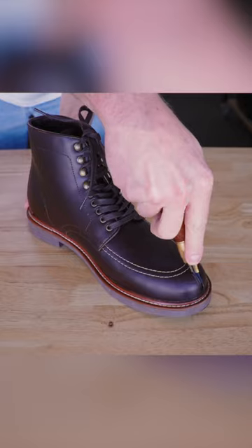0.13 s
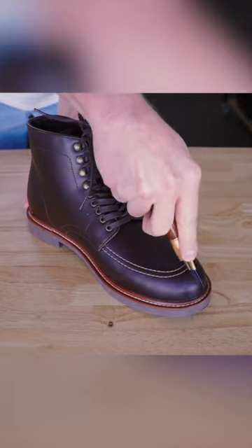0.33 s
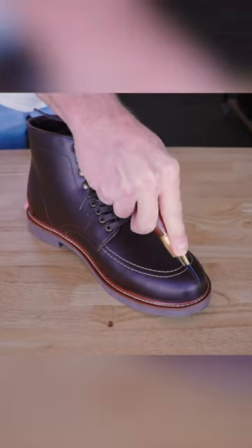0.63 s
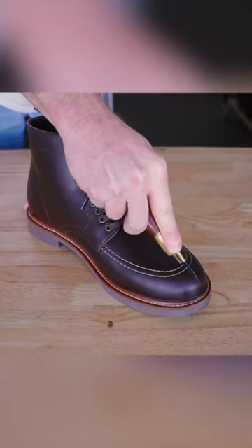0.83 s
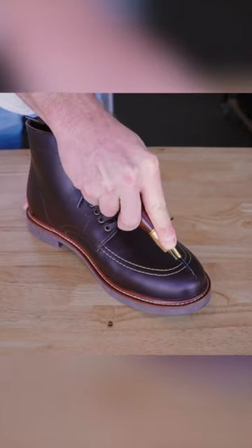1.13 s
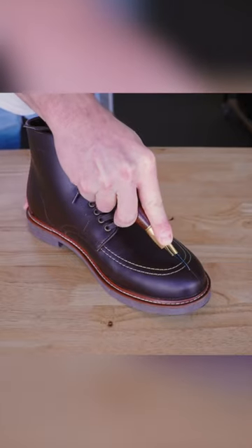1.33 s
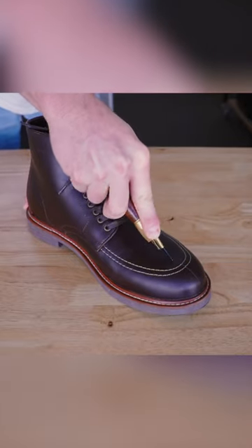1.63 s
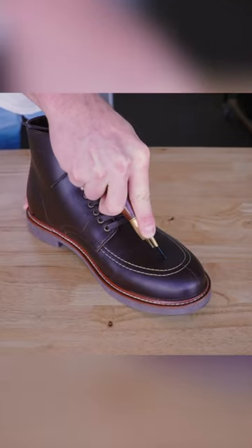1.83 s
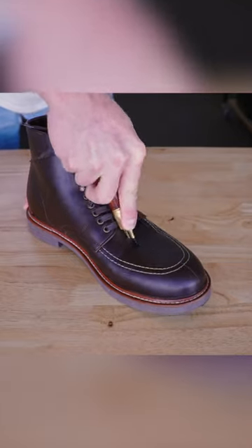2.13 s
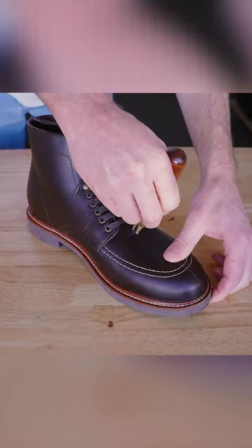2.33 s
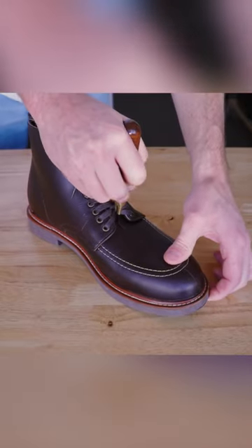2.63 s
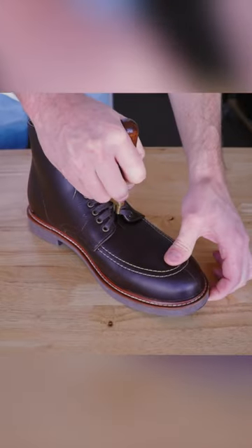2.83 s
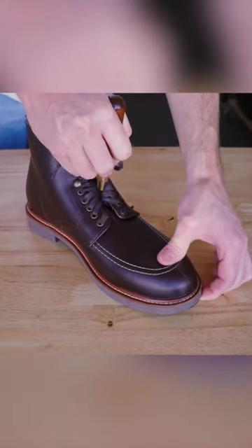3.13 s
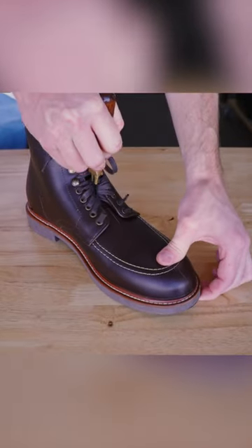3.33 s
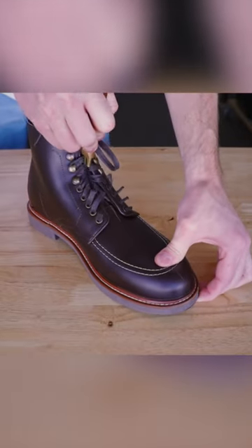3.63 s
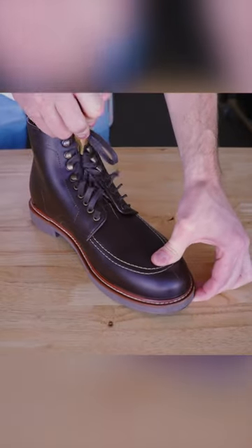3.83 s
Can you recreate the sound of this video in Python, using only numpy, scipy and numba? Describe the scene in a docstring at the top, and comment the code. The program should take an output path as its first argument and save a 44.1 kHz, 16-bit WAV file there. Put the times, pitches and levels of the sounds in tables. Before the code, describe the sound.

Leather scraping and tearing under a blade, followed by a quick run of snapping laces.

```python
"""You hear leather rasping and squeaking in a quiet room, then laces snapping one by one.
A hooked knife is being drawn up a leather boot on a wooden bench, close by. Its fibres tear in
thousands of tiny clicks that make the hollow boot and the blade ring. Just before the laces go,
the boot drops back on the bench with a thump. A limiter holds down the loudest peaks."""
import sys
import numpy as np
from scipy import signal
from scipy.fft import rfft, irfft
from scipy.io import wavfile
from scipy.ndimage import uniform_filter1d, minimum_filter1d
from numba import njit

SR = 44100
rng = np.random.default_rng(int(sys.argv[2]) if len(sys.argv) > 2 else 0)


def digitize_waveform(pressure):
    """Quantize a signal to 16-bit integers and store it at the path in sys.argv[1].

    Rows of a 2-D input are taken as channels; values are limited to [-1, 1].
    """
    field = np.atleast_2d(pressure).T
    bounded = np.clip(field, -1, 1)
    quanta = np.round(bounded * 32767).astype(np.int16)
    wavfile.write(sys.argv[1], SR, quanta)


N = 176400
T = np.arange(N) / SR

# Tone of the room's air: pitch_hz, relative_db
ROOM_TONE = [(18, -44), (30, -21), (86, -3), (486, -9), (889, -15.5), (1250, -25), (1630, -23.5),
             (2170, -34), (2350, -27.5), (16000, -45.5)]
# Swells of the bench's hum: time_s, level_db
HUM_LEVELS = [(0.06, -66), (0.34, -52), (0.41, -71), (1.16, -52), (1.19, -59.5), (1.66, -49), (1.74, -62),
              (2.02, -48), (2.37, -56.5), (2.45, -43), (2.59, -45), (2.66, -28.5), (2.97, -58), (3.1, -35),
              (3.21, -39.5), (3.26, -71), (3.31, -38.5), (3.58, -33.5), (3.68, -50), (3.72, -41),
              (3.8, -39), (3.83, -63), (3.87, -32.5), (4.0, -41)]
# Strength of each part of the cut: time_s, boot_db, rasp_db, blade_db, hiss_db
CUT_LEVELS = [(0.06, -78, -94, -114, -111), (0.11, -75, -92, -115, -111), (0.234, -65, -68, -73, -80),
              (0.41, -43.5, -56.5, -52.5, -69), (0.528, -42.5, -59, -58.5, -70), (0.62, -47, -62, -60, -72),
              (0.64, -44, -66, -55.5, -66), (0.676, -36, -51, -55, -68), (0.69, -32, -50, -39, -42),
              (0.726, -40.5, -53, -51, -64), (0.842, -55, -62.5, -63, -70), (0.86, -43.5, -55, -56, -66),
              (0.95, -50.5, -67, -61, -70), (1.01, -40, -46.5, -54.5, -65), (1.04, -49.5, -59, -57.5, -68),
              (1.25, -44.5, -59, -56, -60), (1.275, -40.5, -55, -49.5, -53.5), (1.32, -44.5, -57, -55, -61),
              (1.385, -39.5, -55, -46, -52), (1.41, -44, -53, -52, -57), (1.44, -45.5, -63, -51, -55),
              (1.46, -33, -51, -45.5, -51), (1.52, -42.5, -54, -45, -52), (1.59, -17.5, -35, -27.5, -30),
              (1.62, -22.5, -37, -30.5, -38), (1.72, -37.5, -51.5, -49, -57.5),
              (1.79, -29.5, -44, -40, -46), (1.82, -33, -41, -38.5, -50), (1.835, -40, -48, -46, -54),
              (1.86, -29, -42, -39, -52), (1.89, -30.5, -45, -39, -50), (1.93, -31, -43, -39, -49.5),
              (2.0, -24.5, -40, -32, -42), (2.02, -13.5, -24.5, -17, -28), (2.04, -20, -40, -31.5, -46),
              (2.11, -34, -49, -43, -52), (2.14, -25, -40.5, -34.5, -45.5),
              (2.24, -32.5, -41.5, -35, -44.5), (2.27, -25.5, -39, -34.5, -48),
              (2.285, -30.5, -44, -39.5, -53), (2.3, -45, -52, -58, -68), (2.43, -46.5, -58, -55.5, -62),
              (2.48, -30.5, -39.5, -42.5, -57), (2.54, -14, -23, -26.5, -39), (2.59, -10, -23, -29.5, -40),
              (2.61, -28, -29, -39, -51), (2.64, -16, -64, -41.5, -61), (2.67, -19.5, -37, -39.5, -50),
              (2.7, -28.5, -45, -54.5, -67), (2.85, -49.5, -72, -66, -70), (2.866, -40, -62, -62, -64),
              (2.871, -18, -29.5, -51, -57), (2.89, -30, -48, -51, -63), (2.9, -24.5, -33, -38, -43.5),
              (2.94, -21.5, -39, -41.5, -49.5), (3.05, -20.5, -31, -31.5, -30.5),
              (3.06, -32, -65, -64, -74), (3.08, -22, -52, -49, -60), (3.18, -35.5, -51, -50.5, -47.5),
              (3.23, -40.5, -66, -64, -68), (3.26, -30, -50, -49, -50), (3.295, -25.5, -42, -41.5, -55),
              (3.351, -33.5, -60, -51, -68), (3.385, -36.5, -40.5, -45, -48), (3.42, -25.5, -48, -39, -60),
              (3.428, -24, -54, -38, -52), (3.485, -27.5, -55, -43, -55), (3.55, -24.5, -37, -42, -51),
              (3.582, -31, -55, -51, -58), (3.632, -25, -36.5, -41, -42.5), (3.674, -45, -55, -57, -69),
              (3.685, -44, -52, -64, -57), (3.71, -24, -40, -37.5, -57), (3.766, -39.5, -53, -54.5, -68),
              (3.84, -23.5, -40, -34, -38), (3.85, -21, -55, -51, -53), (3.86, -40, -58, -45, -48),
              (3.91, -19.5, -50, -35, -41), (3.978, -31, -53, -58, -67), (4.0, -28, -45, -37, -40)]
# Notes of the hollow boot, standing free or held by the toe: pitch_hz, free_db, held_db, ring_s
BOOT_NOTES = [(261, -6, -11.5, 0.044), (290, -9, -14, 0.048), (355.4, -11.5, -1.5, 0.14),
              (390, -3.5, -3, 0.11), (438.5, -1, 0, 0.047), (488, -2, -3.5, 0.048),
              (571.4, -2.5, -5.5, 0.046), (659, -17, -8.5, 0.049), (765, -19, -13.5, 0.045),
              (858, -19, -10.5, 0.055), (926, -15, -16.5, 0.029), (1087, -19.5, -29, 0.068)]
FREE_BOOT = [(hz, db, ring_s) for hz, db, _, ring_s in BOOT_NOTES]
HELD_BOOT = [(hz, db, ring_s) for hz, _, db, ring_s in BOOT_NOTES]
# Notes of the wooden bench: pitch_hz, level_db, ring_s
BENCH_NOTES = [(145.8, -3, 0.29), (204.5, -12.5, 0.53), (211.4, 2.5, 0.23)]
# Air in the toe: time_s, pitch_hz, above_boot_db
TOE_NOTE = [(1.2, 400, -10), (1.55, 438.9, -4), (1.8, 410, -4), (1.95, 431, -4), (2.03, 400, 0.5),
            (2.15, 360, -0.5), (2.22, 368.7, -5.5), (2.27, 420, -2), (2.55, 354.6, -7), (3.4, 351.4, -0.5),
            (4.0, 379.4, -12)]
# Leather rasping under the edge: pitch_hz, width_hz, level_db
RASP_BANDS = [(1108, 170, -1), (1412, 104, -2), (1590, 196, -3)]
# Ring of the blade and tight leather: pitch_hz, width_hz, level_db
BLADE_BANDS = [(2013, 110, -19), (2672, 620, 1.5), (3000, 590, 4.5), (3800, 1520, -3.5), (5240, 1140, -7.5),
               (6540, 810, -9)]
# Hiss of tearing fibres: pitch_hz, width_hz, level_db
HISS_BANDS = [(7800, 5100, 8), (11500, 3500, -3), (13600, 4000, -1)]
# Small ticks of the blade: start_s, level_db, pitch_hz, ring_s
BLADE_TICKS = [(0.1536, -26, 3230, 0.011), (.519, -47, 3000, .006), (0.8896, -11.5, 3440, 0.0032),
               (1.0005, -29.5, 3000, .003), (3.239, -44, 2491, 0.0055), (3.255, -31, 3120, .006),
               (3.388, -36, 11030, .005), (3.681, -26, 10940, 0.0062), (3.818, -29, 12500, .005)]
# Squeaks of the edge: start_s, end_s, start_hz, end_hz, width_hz, above_blade_db
EDGE_SQUEAKS = [(1.564, 1.98, 1372, 1372, 30, -6), (2.13, 2.28, 1400, 1420, 70, -10),
                (2.1, 2.1, 5350, 5250, 210, -7), (2.12, 2.3, 5000, 5400, 140, -5),
                (2.5, 2.62, 5900, 5750, 300, -13), (2.504, 2.62, 9450, 9500, 290, -13),
                (1.445, 1.8, 6600, 7900, 700, -11)]
# The boot landing on the bench: start_s, bench_db, boot_db
BOOT_DROPS = [(2.438, -29, -39), (2.632, 4, -5)]
# Laces breaking: crack_time_s, crack_db, boot_db, bench_db, build_up_s
LACE_SNAPS = [(2.871, -30.5, -13, -19.5, 0.0011), (2.896, -30, -15, -28, 0.0017),
              (2.989, -15, -32, -40, 0.0028), (3.010, -16, -18, -45, 0.00078),
              (3.017, -18, -9.5, -33, 0.0016), (3.031, -22, -19, -38, 0.0012),
              (3.043, -8, -17, -21, 0.0013), (3.049, -21, -2.5, -27, 0.0011),
              (3.2801, -8.5, -10, -17, 0.001), (3.3993, -12, -17.5, -43, 0.0011),
              (3.4054, -3.5, -5, -28, 0.00051), (3.496, -8, -1, -15.5, 0.0015),
              (3.535, -15, -14.5, -39, 0.00063), (3.5397, -8, -5, -18.5, 0.00094),
              (3.6964, -7.5, -5, -20, 0.0014), (3.796, -21.5, -24, -40, .001),
              (3.817, -22, -18, -36, 0.0011), (3.838, -15.5, -9.5, -23, 0.0014),
              (3.8704, -10.5, -8.5, -19, 0.0004), (3.878, -4, -4.5, -19.5, 0.0019),
              (3.884, -14, -12, -19, 0.0014), (3.894, -9, -9, -21, 0.0013), (3.9, -6.5, 0, -29, 0.0015)]

GRIP_S = 2.4  # from here on, the boot is cut while held by the toe
SOFT_PUSH_S = 0.0017  # length of a dull blow


def undb(db):
    """Turn decibels into a number to multiply by."""
    return 10 ** (np.asarray(db) / 20)


def unit(x):
    """Scale a sound to an average strength (RMS) of 1."""
    return x / np.sqrt(np.mean(x ** 2))


def band(x, hz, width):
    """Keep mostly the sound near one pitch."""
    return signal.lfilter(*signal.iirpeak(min(hz, .45 * SR), hz / width, SR), x)


def soft_bands(x, bands):
    """Mix several bands, flipping every other one so they do not cancel in between."""
    return sum((-1) ** k * undb(db) * band(x, hz, w) for k, (hz, w, db) in enumerate(bands))


def steep_bands(x, bands):
    """Mix bands filtered twice, for deeper gaps between them."""
    return sum((-1) ** k * undb(db) * band(band(x, hz, w), hz, w) for k, (hz, w, db) in enumerate(bands))


def ring(force, notes):
    """A struck object rings: each note fades by 60 dB in ring_s."""
    out = 0
    for hz, db, ring_s in notes:
        pole = np.exp(2j * np.pi * hz / SR - np.log(1000) / (ring_s * SR))
        out = out + undb(db) * signal.lfilter([1], [1, -pole], force).imag
    return out


def push(times, dbs, length_s):
    """Smooth blows at the given times; longer ones sound duller."""
    hits, bump = np.zeros(N), np.hanning(int(length_s * SR) + 3)
    hits[(np.asarray(times) * SR).astype(int)] = undb(dbs)
    return np.convolve(hits, bump / bump.sum())[:N]


def room_air(level_db=-49):
    """The room's air: steady, mostly low noise."""
    hz = np.fft.rfftfreq(N, 1 / SR) + 1
    pitch_hz, db = np.array(ROOM_TONE).T
    gain = undb(np.interp(np.log(hz), np.log(pitch_hz), db))
    return unit(irfft(rfft(rng.standard_normal(N)) * gain, N)) * undb(level_db)


def bench_hum(hz=120.03, width_hz=4.2):
    """The bench hums one low, wavering note."""
    note = steep_bands(rng.standard_normal(N), [(hz, width_hz, 0)])
    power = uniform_filter1d(note ** 2, size=SR // 10)
    evened = note / np.sqrt(power + np.var(note) / 8)
    return evened * undb(np.interp(T, *np.array(HUM_LEVELS).T))


def judder(per_s, depth_db):
    """The knife moves jerkily, so the level slides between random steps."""
    hold = int(SR / per_s)
    steps = np.repeat(rng.standard_normal(N // hold + 1), hold)
    return undb(depth_db * unit(uniform_filter1d(steps, hold // 2)[:N]))


def tearing(per_s, spread_db=3):
    """Fibres part in a crowd of uneven clicks."""
    chance, size = rng.random(N), np.minimum(rng.exponential(size=N), 4)
    return (chance < per_s / SR) * undb(spread_db * size) * rng.choice([-1, 1], N)


def rough_note(clicks, pitch_hz, width_hz):
    """A gliding note whose strength shakes with the smoothed clicks."""
    shake = unit(signal.lfilter(*signal.butter(2, width_hz / 2, fs=SR), clicks))
    return shake * np.sin(2 * np.pi * np.cumsum(pitch_hz) / SR)


def hollow_boot(clicks, level_db, bench_db=-11.5):
    """Tearing shakes the boot and the bench under it."""
    force = clicks * undb(level_db)
    boot = ring(force * (T < GRIP_S), FREE_BOOT) + ring(force * (T >= GRIP_S), HELD_BOOT)
    bench = undb(bench_db) * ring(force, BENCH_NOTES)
    return (boot + bench) / np.std(ring(clicks, HELD_BOOT))


def toe_air(clicks, boot_db):
    """Air in the toe sounds a note that shifts as the cut opens."""
    times, hz, db = np.array(TOE_NOTE).T
    note = rough_note(clicks, np.interp(T, times, hz), width_hz=30)
    return note * undb(boot_db + np.interp(T, times, db))


def cutting():
    """The juddering knife tears fibres, which hiss and set boot, leather and blade ringing."""
    jerks = judder(per_s=59.45, depth_db=1.37)
    clicks = unit(tearing(per_s=9000) * jerks)
    fine_clicks = tearing(per_s=6000) * jerks * judder(per_s=90.8, depth_db=1.5)
    times, *levels = np.array(CUT_LEVELS).T
    boot_db, rasp_db, blade_db, hiss_db = (np.interp(T, times, db) for db in levels)
    boot = hollow_boot(clicks, boot_db) + toe_air(clicks, boot_db)
    rasp = unit(soft_bands(clicks, RASP_BANDS))
    blade = unit(steep_bands(clicks, BLADE_BANDS)) + edge_squeaks(clicks)
    hiss = sum(undb(db) * band(fine_clicks, hz, width) for hz, width, db in HISS_BANDS)
    hiss = unit(signal.lfilter(*signal.butter(2, 6500, "high", fs=SR), hiss))
    return boot + rasp * undb(rasp_db) + blade * undb(blade_db) + hiss * undb(hiss_db)


def blade_ticks(rustle_s=0.023):
    """A tiny, sharp blow rings the blade, and a faint rustle follows."""
    out, noise = 0, rng.standard_normal(N)
    for start, db, hz, ring_s in BLADE_TICKS:
        tick = ring(push([start], [db], length_s=0.00008), [(hz, 0, ring_s)])
        age = np.maximum(T - start, 0)
        fade = (age > 0) * np.exp(-age / rustle_s)
        rustle = unit(steep_bands(noise, [(hz, 0.38 * hz, 0)]))
        out = out + tick + undb(db - 17) / 4 * fade * rustle
    return out


def edge_squeaks(clicks, fade_s=0.019):
    """The edge squeaks in short, thin notes as it cuts."""
    out = 0
    for start, end, start_hz, end_hz, width_hz, db in EDGE_SQUEAKS:
        fade = np.clip(np.minimum(T - start, end - T) / fade_s, 0, 1)
        pitch_hz = np.interp(T, [start, end], [start_hz, end_hz])
        out = out + undb(db) * fade * rough_note(clicks, pitch_hz, width_hz)
    return out


def boot_thumps():
    """The sole lands softly on the bench, and both ring."""
    times, bench_db, boot_db = np.array(BOOT_DROPS).T
    bench = ring(push(times, bench_db, SOFT_PUSH_S), BENCH_NOTES)
    return bench + ring(push(times, boot_db, SOFT_PUSH_S), HELD_BOOT)


def lace_snaps(crack_s=0.0015):
    """Each lace tears for an instant, cracks, and jolts the boot and bench."""
    loudness = np.zeros(N)
    for time, db, _, _, build_up_s in LACE_SNAPS:
        age = T - time
        loudness += undb(db) * np.exp(np.where(age < 0, age / build_up_s, -age / crack_s))
    crack = loudness * rng.standard_normal(N) / 2
    blade_and_leather = soft_bands(crack, BLADE_BANDS) + undb(-4.5) * soft_bands(crack, RASP_BANDS)
    times, _, boot_db, bench_db, _ = np.array(LACE_SNAPS).T
    jolt_note = (422, 2.5, 0.044)  # pitch_hz, level_db, ring_s
    boot = ring(push(times, boot_db, length_s=0.00062), [jolt_note] + HELD_BOOT)
    bench = ring(push(times, bench_db, SOFT_PUSH_S), BENCH_NOTES)
    return crack / 2 + undb(10.5) * blade_and_leather + boot / 3 + bench


def room_echo(sound, ring_s=0.35, level_db=-20):
    """The room sends back a faint, bright echo that dies quickly."""
    t = T[:SR // 2]
    noise = band(rng.standard_normal(len(t)), hz=4000, width=7200)
    tail = noise * np.exp(-np.log(1000) * t / ring_s) * (t > .005)
    return undb(level_db) * signal.fftconvolve(sound, tail / np.sqrt(np.sum(tail ** 2)))[:N]


def scene(low_cut_hz=236):
    """Mix the knife and boot with their echo, the hum and the room's air."""
    near = cutting() + lace_snaps() + blade_ticks() + boot_thumps()
    # Small things give off little bass.
    near = signal.sosfilt(signal.butter(4, low_cut_hz, "high", fs=SR, output="sos"), near)
    return (near + room_echo(near) + bench_hum() + room_air())[None]


@njit
def limiter_gain(allowed, step):
    """The volume drops at once for a peak and climbs back slowly."""
    gain, out = 1., np.empty(len(allowed))
    for i in range(len(allowed)):
        gain = min(allowed[i], gain + (1 - gain) * step)
        out[i] = gain
    return out


def record(dry, limit=0.5, release_s=0.092, silent_s=0.057, top_hz=16000):
    """Turn down just ahead of each peak, open with a moment of silence and cut the highest treble."""
    allowed = minimum_filter1d(limit / np.maximum(np.abs(dry[0]), limit), size=89)
    gain = uniform_filter1d(limiter_gain(allowed, 1 / (release_s * SR)), size=44)
    treble_cut = signal.ellip(10, .2, 80, top_hz, fs=SR, output="sos")
    return signal.sosfilt(treble_cut, dry * gain * (T > silent_s))


dry = scene()
out = record(dry)
digitize_waveform(out)
```